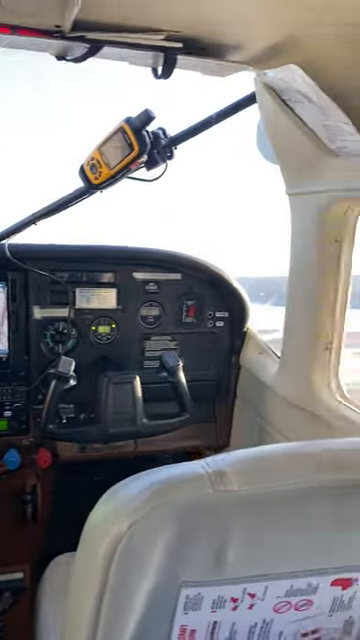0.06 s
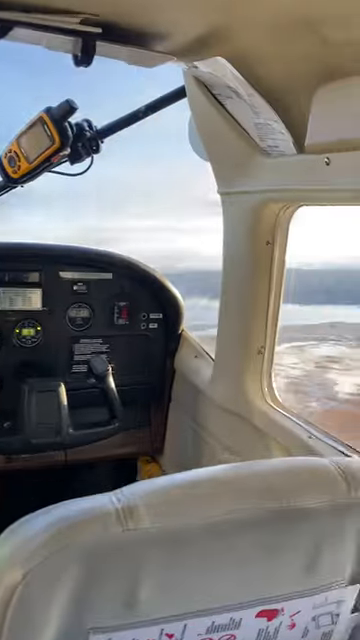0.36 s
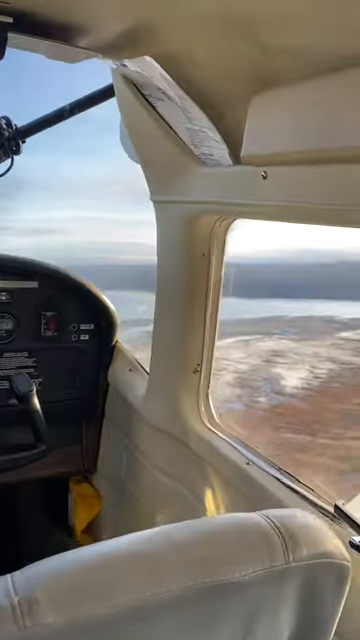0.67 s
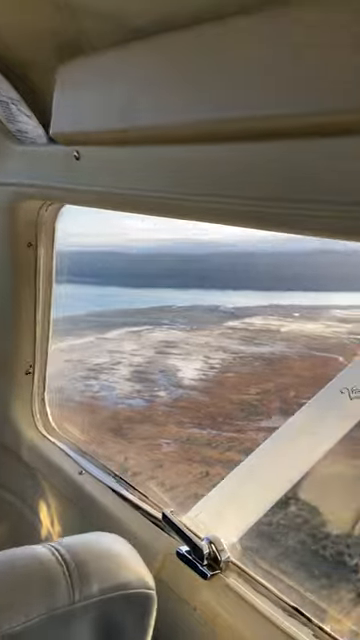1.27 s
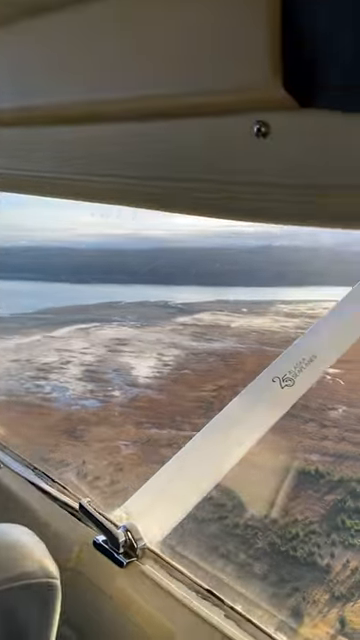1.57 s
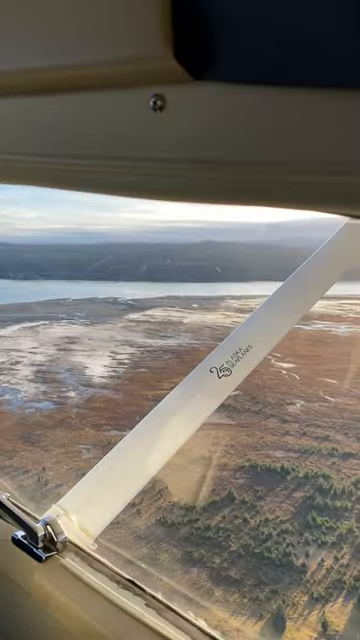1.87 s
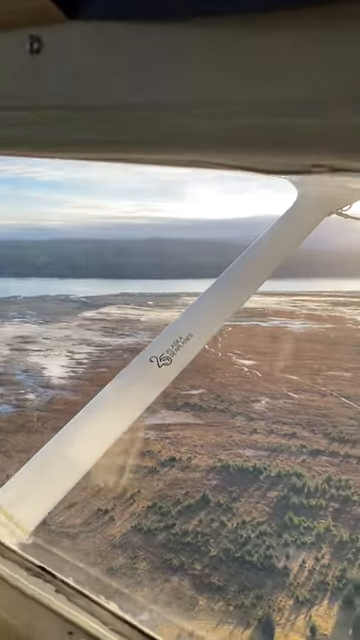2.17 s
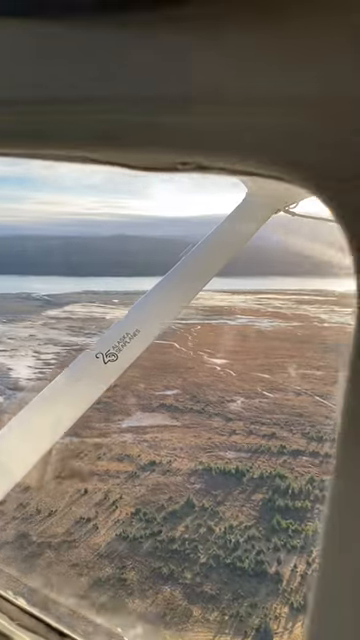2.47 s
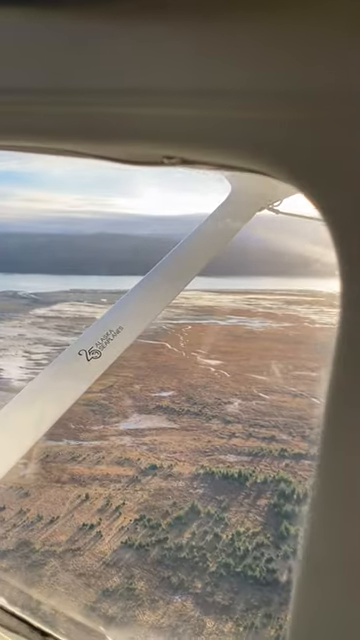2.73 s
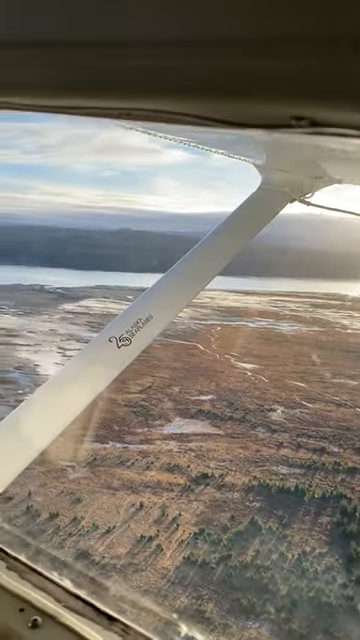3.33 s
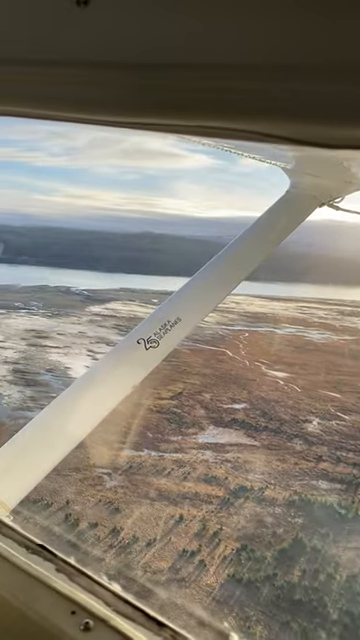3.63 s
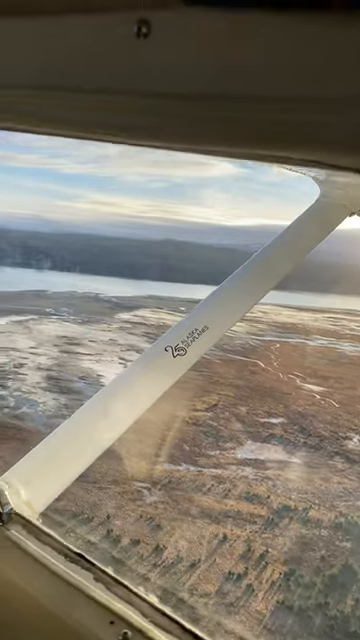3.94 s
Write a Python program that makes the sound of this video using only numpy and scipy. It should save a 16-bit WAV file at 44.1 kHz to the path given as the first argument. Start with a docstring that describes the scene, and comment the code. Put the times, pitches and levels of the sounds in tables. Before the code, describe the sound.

A small plane's engine and propeller drone loudly and steadily, heard from inside the cabin in flight. A fine buzz rides on the low hum, while air rumbles and hisses past the walls and windows throughout.

```python
"""Small propeller plane, cabin at cruise

Exhaust and blade pulses drone on exact multiples of the engine cycle; unequal cylinders add lines
between them, with a fine buzz on top. Four drone tones swell and fade as a phone, turning from the
panel to the side window, crosses the cabin's standing waves. Slipstream rumbles and hisses."""
import sys
import numpy as np
from scipy import signal
from scipy.fft import rfft, irfft
from scipy.io import wavfile
from scipy.ndimage import uniform_filter1d, minimum_filter1d

SR = 44100
rng = np.random.default_rng(int(sys.argv[2]) if len(sys.argv) > 2 else 0)


def master_out(mix):
    """Clip the mix to full scale and print it as 16-bit PCM to the path in sys.argv[1]."""
    frames = np.transpose(np.atleast_2d(mix))
    ceiling = np.clip(frames, -1, 1)
    pcm = np.round(ceiling * 32767).astype(np.int16)
    wavfile.write(sys.argv[1], SR, pcm)


N = 176400

CYCLE_HZ, PULSES_PER_CYCLE = 21.762, 3
SMEAR_HZ = 420  # above this, cabin reflections scramble the shape of the pulses
SIDE_HZ, SIDE_MAX = 1250, .42  # stereo width: side over mid grows as (f / SIDE_HZ)^1.5, up to SIDE_MAX
# Midrange ride as the phone moves through the cabin: t/s, level/dB
MIDRANGE_RIDE = [(0, .4), (1.0, .8), (1.6, .5), (2.2, -.3), (2.6, -1.7), (3.1, -.6), (3.4, 0.2), (4, -0.2)]


def engine(turns, swelling_wander_db=.4, steady_wander_db=1.5):
    """Exhaust and blades: drone tones riding the standing waves, and steadier tones around them."""
    # Drone tones that swell and fade, by multiple of the engine cycle: t/s, level/dB
    swelling_tones = {6: [(0, -12.5), (0.4, -14.5), (0.9, -16.8), (1.4, -16), (1.7, -14), (2.4, -12.5),
                      (2.8, -13.1), (4, -13)], 9: [(0, -27.5), (0.25, -20.5), (0.5, -17.5), (1.1, -16.4),
                      (2, -15.5), (4, -16.5)], 12: [(0, -27), (0.7, -28.5), (1.3, -39), (1.7, -52.6),
                      (2.1, -35.5), (2.6, -28.5), (3.1, -29), (3.4, -31.5), (4, -35)], 18: [(0, -46),
                      (0.35, -32.5), (0.7, -29.5), (1.1, -25.7), (1.7, -25.1), (2.1, -24), (2.7, -25.5),
                      (3.4, -22), (4, -22)]}
    # Steadier tones of exhaust, blades and uneven firing: multiple of the cycle, level/dB
    steady_tones = [(2, -52.5), (3, -25.5), (4, -34.5), (5, -51), (7, -41), (8, -43.5), (10, -44),
                    (11, -59), (13, -36), (14, -35), (15, -47), (16, -46), (17, -41), (19, -38.5),
                    (20, -34), (21, -33.5), (22, -50), (23, -52), (24, -37), (25, -43), (26, -52.5),
                    (27, -33), (28, -44.5), (29, -41), (30, -38), (31, -52), (32, -60), (33, -65),
                    (34, -47), (35, -45), (36, -45), (37, -47), (38, -43), (39, -52), (40, -51),
                    (41, -46.5), (42, -51), (43, -45), (44, -48.5), (45, -47), (46, -50.5), (47, -54.5),
                    (48, -45), (49, -52.5), (51, -50), (53, -60), (56, -52.5), (61, -49.5), (62, -55.5),
                    (63, -62), (64, -60)]
    out = np.zeros((2, N))
    for order, ride in swelling_tones.items():
        out += engine_tone(turns, order, curve(ride) + swelling_wander_db * walk(5.95), flutter_rad=.025)
    midrange = curve(MIDRANGE_RIDE)
    for order, db in steady_tones:
        reach = min(order * CYCLE_HZ / SMEAR_HZ, 1) ** 2  # short waves change most as the phone moves
        sway_db = reach * (midrange + steady_wander_db * walk(1.83))
        out += engine_tone(turns, order, db + sway_db, flutter_rad=.05)
    return out


def engine_tone(turns, order, db, flutter_rad, delay_s_per_hz=1.8e-5):
    """One stereo harmonic of the cycle; low exhaust tones line up into pulses, the rest scatter."""
    hz = order * CYCLE_HZ
    scatter, side_phase = rng.uniform(-np.pi, np.pi, 2)
    if order % PULSES_PER_CYCLE == 0 and hz < SMEAR_HZ:
        scatter = 0
    lag = np.pi * delay_s_per_hz * hz ** 2  # higher tones come through the fuselage later
    phase = 2 * np.pi * order * turns - lag + scatter + flutter_rad * walk(5)
    width = min((hz / SIDE_HZ) ** 1.5, SIDE_MAX)
    gain = -np.sqrt(2 / (1 + width ** 2)) * undb(db)
    mid, side = np.cos(phase), width * np.cos(phase + side_phase)
    return gain * np.array([mid + side, mid - side])


def buzz(turns, size=4096, count=180, scatter_db=3):
    """High engine overtones: a dense rattle that repeats every cycle and slowly morphs its pattern."""
    # Envelope of the single overtones: f/Hz, level/dB
    overtones = [(1080, -61), (1400, -59), (1700, -59), (2000, -64), (2800, -63.5), (4000, -73)]
    hz = np.arange(count) * CYCLE_HZ
    gain = undb(at_hz(overtones, hz)) * (hz > overtones[0][0])

    def rattle():
        levels = gain * undb(scatter_db * rng.standard_normal(count))
        lines = levels * np.exp(2j * np.pi * rng.random(count))
        wavetable = irfft(lines, size) * size / np.sqrt(2)
        return np.interp(turns % 1 * size, np.arange(size), wavetable)

    crossfade = np.linspace(0, np.pi / 2, N)
    mid, side = (np.cos(crossfade) * rattle() + np.sin(crossfade) * rattle() for _ in range(2))
    return (mid + SIDE_MAX * np.array([side, -side])) / np.hypot(1, SIDE_MAX)


def slipstream(turns, rumble_hz=300, hiss_hz=2000, seal_hz=2840, seal_width_hz=330,
               buffet_db=.7, gust_db=.35):
    """Air buffets the cabin walls, roars past and hisses at the seals, with a slight engine throb."""
    # Slipstream and cabin rumble, as noise density: f/Hz, level/dB
    air_colour = [(20, -73.9), (32, -67), (46, -54), (88, -40.5), (115, -44.5), (185, -41.5), (235, -49.5),
                  (400, -50.5), (520, -55), (750, -62), (1100, -63.5), (1600, -66.5), (1850, -69.5),
                  (2300, -68), (2750, -66), (3500, -71), (4500, -75.5), (5600, -77), (7200, -89),
                  (10000, -85.5), (15000, -91)]
    # Air noise at the two microphone ports: f/Hz, coherence (0-1), lead of the left/rad
    stereo_image = [(60, .9998, 0), (120, .998, 0), (250, .96, 0), (450, .88, -.1), (800, .7, 0),
                    (1500, .82, .15), (2100, .66, .35), (2600, .62, 1.2), (3400, .5, 1.2), (4000, .68, .9),
                    (4650, .56, 1), (5300, .76, .35), (7200, .9, 3.14), (10300, .86, 6.28),
                    (13500, .84, 9.4), (16000, .7, 12.2)]
    # Rumble ride as the phone moves: t/s, level/dB
    rumble_ride = [(0, -3.2), (1, -2.1), (2, -.9), (4, -.7)]
    # Ride of the whole hiss: t/s, level/dB
    hiss_ride = [(0, -1), (1.2, -0.2), (2.3, 0.1), (3.3, 0.2), (4, 0.5)]
    # The window seal's band, rising as the phone turns to it: t/s, level/dB
    seal_ride = [(0, -2), (.6, -1.7), (.9, .7), (2, .6), (3, 1.1), (4, .1)]
    hz = np.arange(N // 2 + 1) * SR / N
    image_hz, coherence, lead = np.array(stereo_image).T
    coherence, lead = np.interp(hz, image_hz, coherence), np.interp(hz, image_hz, lead)
    mid, side = rfft(rng.standard_normal((2, N))) * np.sqrt([(1 + coherence) / 2, (1 - coherence) / 2])
    air = np.array([(mid + side) * np.exp(1j * lead), mid - side])
    air *= undb(at_hz(air_colour, hz)) * np.sqrt(SR / 2)
    low, high = 1 / (1 + (hz / rumble_hz) ** 4), 1 - 1 / (1 + (hz / hiss_hz) ** 4)
    rumble = irfft(air * low, N) * undb(curve(rumble_ride) + buffet_db * walk(5.1))
    roar = irfft(air * (1 - low - high), N) * undb(curve(MIDRANGE_RIDE) + gust_db * walk(8.97))
    seal = np.exp(-((hz - seal_hz) / seal_width_hz) ** 2)
    hiss = irfft(air * high * (1 - seal), N) + irfft(air * high * seal, N) * undb(curve(seal_ride))
    hiss *= undb(curve(hiss_ride) + gust_db * walk(9))
    throb = 1 + .032 * np.cos(2 * np.pi * turns) + .034 * np.cos(2 * np.pi * 6 * turns)  # cycle, blades
    return rumble + (roar + hiss) * throb


def wall_reflections(air, delays_s=(.0016, .0027, .0043, .0056), drift_s=.00015, gain=.13):
    """Close reflections from windows and roof ripple the colour of the air as the phone moves."""
    out, samples = air, np.arange(N)
    for delay in delays_s:
        tap = (samples - SR * (delay + drift_s * walk(1))) % (N - 1)
        out = out + gain * np.array([np.interp(tap, samples, channel) for channel in air])
    return out


def undb(db):
    """Decibels to gain."""
    return 10 ** (np.asarray(db) / 20)


def curve(rows):
    """Rows of (t/s, value) joined by straight lines."""
    return np.interp(np.arange(N) / SR, *np.array(rows, float).T)


def at_hz(rows, hz):
    """Rows of (f/Hz, value) read on a log-frequency axis."""
    f, values = np.array(rows, float).T
    return np.interp(np.log(np.maximum(hz, 1)), np.log(f), values)


def walk(rate):
    """Smooth random drift with spread 1 that changes course about rate times a second."""
    hold = int(SR / rate)
    steps = np.repeat(rng.standard_normal(N // hold + 4), hold)
    start = hold + rng.integers(hold)
    return np.sqrt(3 / 2) * uniform_filter1d(steps, hold)[start:start + N]


def scene(speed_drift=.0002, first_pulse_s=.002503):
    """One engine speed drives the drone, the buzz and the throb of the air."""
    cycle_hz = CYCLE_HZ * (1 + speed_drift * walk(2.04))
    turns = np.cumsum(cycle_hz) / SR - first_pulse_s * CYCLE_HZ  # engine cycles elapsed
    return engine(turns) + buzz(turns) + wall_reflections(slipstream(turns))


def record(dry, ceiling=.92, ramp_samples=441, top_hz=15750):
    """The phone's limiter eases the highest peaks; a steep low-pass cuts the top."""
    allowed = ceiling / np.maximum(np.abs(dry).max(axis=0), ceiling)
    gain = uniform_filter1d(minimum_filter1d(allowed, 2 * ramp_samples), ramp_samples)
    return signal.sosfilt(signal.ellip(10, .1, 80, top_hz, fs=SR, output="sos"), dry * gain)


dry = scene()
out = record(dry)
master_out(out)
```